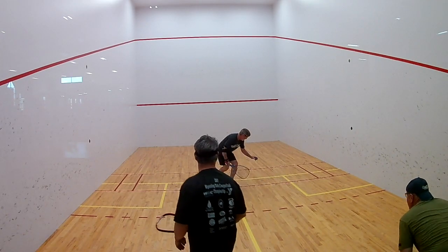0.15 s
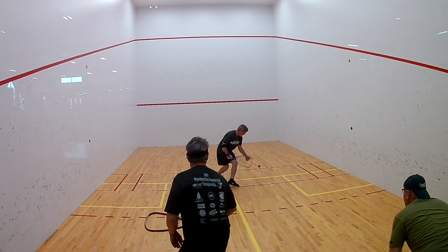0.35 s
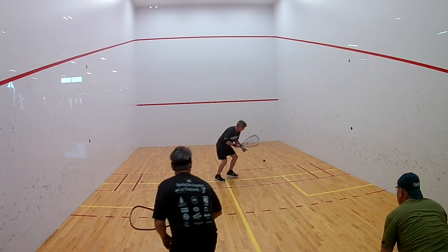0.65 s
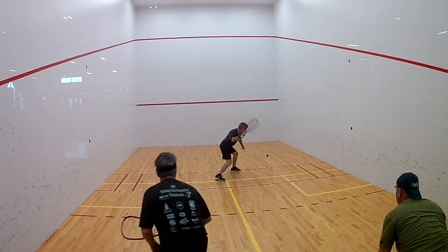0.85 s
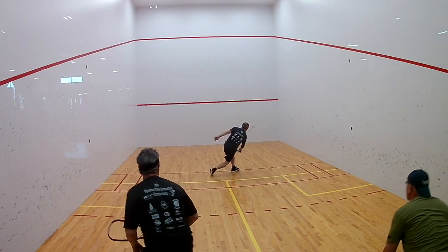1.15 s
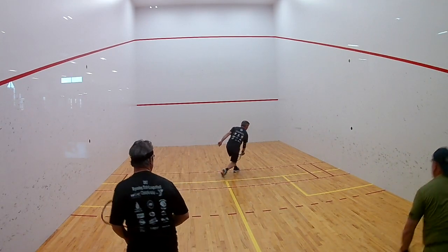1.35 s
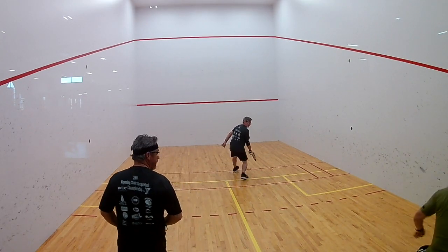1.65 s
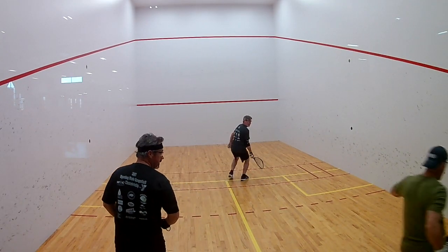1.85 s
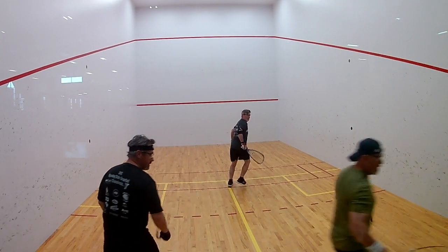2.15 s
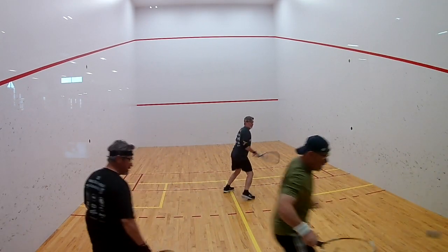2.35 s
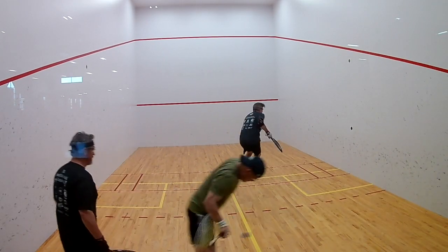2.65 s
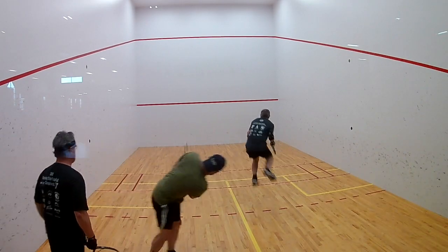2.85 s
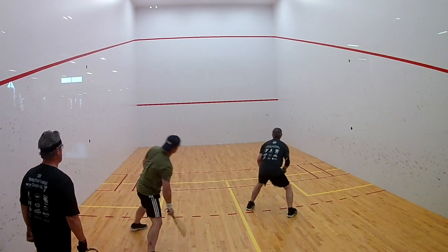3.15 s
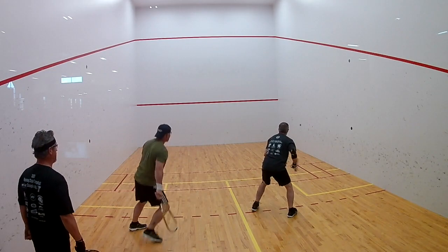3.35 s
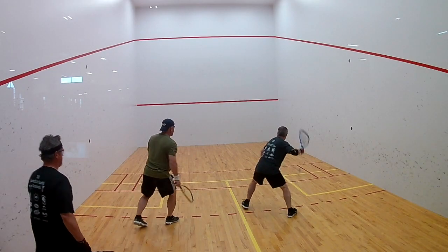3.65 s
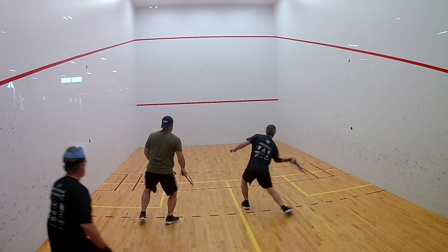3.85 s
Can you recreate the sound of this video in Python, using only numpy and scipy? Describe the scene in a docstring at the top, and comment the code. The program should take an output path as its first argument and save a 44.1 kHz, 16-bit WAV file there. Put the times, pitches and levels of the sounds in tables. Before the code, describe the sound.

Hollow racket and ball hits ring through an indoor court, with thuds and shoe squeaks.

```python
"""Ball court through the glass

One microphone behind the glass back wall of a hard-walled indoor court. A hollow rubber ball is struck
and cracks off the front wall; feet thump the sprung floor and shoes squeak, all ringing on for seconds.
Soles scuff on the near side of the glass, where the echo is shorter. The ventilation hums underneath."""
import sys
import numpy as np
from scipy import signal
from scipy.fft import rfft, irfft, next_fast_len
from scipy.io import wavfile
from scipy.ndimage import uniform_filter1d, map_coordinates

SR = 44100
rng = np.random.default_rng(int(sys.argv[2]) if len(sys.argv) > 2 else 0)


def pcm_store(signal):
    """Save signal as 16-bit PCM."""
    levels = np.round(np.clip(np.atleast_2d(signal), -1, 1) * 32767)
    wavfile.write(sys.argv[1], SR, levels.astype(np.int16).T)


N = 176400

# room tone of the ventilation: (frequency [Hz], relative level [dB])
AIR_SPECTRUM = [(15, -69.5), (25, -17.5), (97, -6), (125, -12.5), (162, -13.5), (195, -13), (252, -11),
                (311, -13.5), (412, -20), (545, -20), (721, -25.5), (773, -21.5), (1290, -29), (1750, -39),
                (1880, -38.5), (2060, -43.5), (2900, -47), (3300, -59.5), (3800, -49.5), (5000, -57.5),
                (6620, -69.5), (8610, -130.5), (14600, -120)]
# how long the court rings: (frequency [Hz], t60 [s])
COURT_T60 = [(100, 0.71), (300, 3.31), (800, 4.93), (1500, 3.3), (3000, 3.18), (6000, 1.82)]
# how slowly the reverberation fills in: (frequency [Hz], time constant [s])
COURT_BUILD = [(150, 0.019), (400, 0.024), (1000, 0.0072), (2500, 0.015), (5000, 0.0054)]
# first reflections off the walls: (delay [s], level [dB])
WALL_ECHOES = [(.03, 24), (.074, 17.5), (.095, 16), (.143, 12)]
# first reflections of the ball's bright snap: (delay [s], level [dB])
SNAP_WALL_ECHOES = [(.045, 15), (.073, 30), (.095, 18.5), (.147, 24.5)]
# colour of a blow heard through the glass: (frequency [Hz], relative level [dB])
GLASS_COLOUR = [(35, -73), (60, -18), (102, -8), (140, -17), (177, -0.5), (207, -11), (284, 0.5),
                (523, -7.5), (662, -2), (1000, -4.5), (1320, -9.5), (1610, -20), (1900, -24), (2780, -28),
                (3200, -38.5), (3600, -36.5), (3820, -25), (4050, -32.5), (4740, -31.5), (6620, -41),
                (8610, -78.5), (14600, -120)]
# dragging soles: (time [s], level [dB], length [s], tilt [dB/octave])
SOLE_SCUFFS = [(0.166, -43, 0.041, -10), (0.376, -34, 0.15, -3), (2.782, -39.5, 0.018, -2.5),
               (2.928, -39, 0.07, -2)]
# slipping shoes: (time [s], level [dB], start pitch [Hz], end pitch [Hz], length [s])
SHOE_SQUEAKS = [(1.66, -71.5, 10900, 9600, .024), (2.342, -49, 4350, 3815, .02),
                (2.751, -62, 6430, 5910, .01), (2.754, -50, 5910, 5670, 0.016)]
# feet landing: (time [s], level [dB], floor pitch [Hz])
FOOTFALLS = [(2.153, -21, 108.8), (2.16, -25, 194.6), (2.176, -26, 60), (2.235, -22.5, 108),
             (3.057, -26, 105)]
# ball contacts: (time [s], level [dB], pock pitch [Hz], pock lag [s], pock hold [s],
# pock into the court [dB], overtone into the court [dB], slap boom [dB], slap bass [dB], slap edge [dB],
# direct pock [dB], its return relative to it [dB], direct slap [dB], flutter depth [dB],
# snap centre [Hz], snap half width [Hz], direct snap t60 [s], direct snap [dB], snap into the court [dB])
BALL_CONTACTS = [(1.074, -22.5, 710, 0.003, 0.017, 2, -8.5, 6, -4, 3, 37, -0.5, 24.6, 1.9, 4300, 1000, 0.044, 6, -23.5),
                 (1.104, -18, 1046, .008, 0.013, -13, -26, 0.5, -8.5, -2, 26.9, -4.5, 23, 1.8, 4530, 1200, 0.17, 15.5, -30),
                 (1.196, -11.5, 680.7, 0.013, 0.015, -18, -16, -4.5, 1, 3.5, 24.7, -6.5, 25, 1.7, 4800, 1300, 0.16, 12.5, -25),
                 (3.199, -19.5, 798.6, 0.0024, 0.012, -1, -8.5, 10, -3.5, -4, 32, -11, 8, 1.6, 4300, 600, 0.082, -1, -36.5),
                 (3.973, -18.5, 734, .0012, .012, 4, -9, 9.5, -7.5, -2.5, 34, -12, 7.3, 5.6, 4200, 600, .04, -11, -42)]
# faint high grit and hiss above 7 kHz: (frequency [Hz], relative level [dB])
GRIT_SPECTRUM = [(6500, -45), (7300, -7.5), (8000, -11.5), (9700, -7.5), (11000, -10), (15500, -10)]

AIR_DB, HUM_DB, WAVER_DB, HUM_HZ, HUM_WIDTH_HZ = -34.5, -44, 3, 93, 13
FLUTTER_S, FLUTTER_DB, FLUTTER_FADE_S = .0305, -2, .16  # echo between the side walls: trip, depth, fade
LENGTHWISE_S, LENGTHWISE_DB = .083, 3.5  # echo between the end walls: trip, depth
SMEAR_T60_S, SNAP_SMEAR_T60_S, BURST_RISE_S = .06, .035, .0015
SCUFF_LOW_HZ, SQUEAK_ROUGHNESS, SQUEAK_DIRECT_DB = 920, .6, 36
STEP_T60_S, STEP_WET_DB, STEP_DIRECT_DB = .15, -11.5, 27
BOOM_HZ, BASS_HZ, EDGE_HZ, TREBLE_HZ, SLAP_TREBLE_DB = 230, 520, 2800, 3500, -8.5
POCK_RISE_S, POCK_T60_S, OVERTONE_RATIO = .003, .011, 1.51
POCK_SAG = .067  # share of its pitch that the pock loses while it is held
END_WALL_S = .074  # the pock returns whole from the far wall after this
GRIT_DB, GRIT_SMOOTH_S, HISS_DB, PEAK_LIMIT, TOP_HZ = -47, .012, -96, .95, 15720


def amp(db):
    """dB to gain."""
    return 10 ** (np.asarray(db) / 20)


def unit(x):
    """Scale to rms 1."""
    return x / np.sqrt(np.mean(x ** 2) + 1e-20)


def unit_energy(x):
    """Scale to energy 1."""
    return x / np.linalg.norm(x)


def along(points, hz):
    """Read (frequency, value) points on a log frequency axis."""
    freqs, values = np.transpose(points)
    return np.interp(np.log(hz + 1), np.log(freqs + 1), values)


def filtered(x, response):
    """Shape x by a gain per frequency."""
    size = next_fast_len(N + 8192)
    return irfft(rfft(x, size) * response(np.fft.rfftfreq(size, 1 / SR)), size)[:N]


def pulse(gain, size=8192):
    """The shortest causal pulse of energy 1 with this gain per frequency."""
    cepstrum = irfft(np.log(gain(np.fft.rfftfreq(size, 1 / SR)) + 1e-6))
    cepstrum[1:size // 2] *= 2
    cepstrum[size // 2 + 1:] = 0
    return unit_energy(irfft(np.exp(rfft(cepstrum))))


def burst(t60=SMEAR_T60_S):
    """Scatter off a rough contact or wall: quickly dying noise of energy 1."""
    t = np.arange(SR // 10) / SR
    return unit_energy(rng.standard_normal(len(t)) * amp(-60 * t / t60) * (1 - np.exp(-t / BURST_RISE_S)))


def ventilation():
    """Room tone: steady air noise and a wavering low hum."""
    waver = map_coordinates(rng.standard_normal(40), [np.arange(N) * 8 / SR])  # 8 values a second
    air = unit(filtered(rng.standard_normal(N), lambda f: amp(along(AIR_SPECTRUM, f))))
    hum = filtered(rng.standard_normal(N), lambda f: 1 / (1 + (2 * (f - HUM_HZ) / HUM_WIDTH_HZ) ** 2))
    return amp(AIR_DB) * air + amp(HUM_DB + WAVER_DB * waver) * unit(hum)


def court(direct, sound, start, wet_db=0, t60_scale=1, flutter_db=FLUTTER_DB, flutter_s=FLUTTER_S,
          echoes=WALL_ECHOES, smear_t60=SMEAR_T60_S):
    """`direct` reaches the microphone first; `sound` follows as wall echoes and a fluttering tail."""
    hz, t, noise = signal.stft(rng.standard_normal(3 * SR), SR, nperseg=256)
    fill = 1 - np.exp(-t / along(COURT_BUILD, hz)[:, None])
    decay = amp(-60 * t / t60_scale / along(COURT_T60, hz)[:, None])
    response = signal.istft(noise * fill * decay, SR, nperseg=256)[1]
    since = np.arange(len(response)) / SR
    response *= amp(flutter_db * np.exp(-since / FLUTTER_FADE_S) * np.cos(2 * np.pi * since / flutter_s))
    for delay, db in echoes:
        response[round(delay * SR):][:SR // 10] += amp(db) * burst(smear_t60)
    heard = amp(wet_db) * signal.fftconvolve(sound, response)
    heard[:len(direct)] += direct
    return np.pad(heard, (round(start * SR), N))[:N]


def scuffs():
    """Soles drag softly on the microphone's side of the glass, where the echo is shorter."""
    out = 0
    for start, db, length, tilt_db in SOLE_SCUFFS:
        progress = np.linspace(0, 1, round(length * SR))
        rub = unit_energy(rng.standard_normal(len(progress)) * np.sin(np.pi * np.sqrt(progress)))
        colour = pulse(lambda f: amp(along(GLASS_COLOUR, f) + tilt_db * np.log2(f / SCUFF_LOW_HZ + .01))
                       / (1 + (SCUFF_LOW_HZ / (f + 1)) ** 4))
        rub = signal.fftconvolve(rub, colour)
        out += amp(db) * court(rub, rub, start, t60_scale=.24)
    return out


def squeaks():
    """Out on the court, rubber slips on varnish: a short rough whistle that falls in pitch."""
    out = 0
    for start, db, from_hz, to_hz, length in SHOE_SQUEAKS:
        progress = np.linspace(0, 1, round(length * SR))
        hz = to_hz + (from_hz - to_hz) * (1 - progress) ** 2
        rough = unit(uniform_filter1d(uniform_filter1d(rng.standard_normal(len(hz)), size=70), size=70))
        envelope = np.sin(np.pi * progress) ** 2 * (1 + SQUEAK_ROUGHNESS * rough)
        tone = unit_energy(envelope * np.sin(2 * np.pi * np.cumsum(hz) / SR))
        out += amp(db) * court(amp(SQUEAK_DIRECT_DB) * tone, tone, start, t60_scale=.94)
    return out


def steps():
    """A foot lands and the sprung floor gives a dull boom."""
    t, out = np.arange(SR // 4) / SR, 0
    for start, db, hz in FOOTFALLS:
        boom = unit_energy(np.sin(2 * np.pi * hz * t) * amp(-60 * t / STEP_T60_S))
        out += amp(db) * court(amp(STEP_DIRECT_DB) * boom, boom, start, wet_db=STEP_WET_DB)
    return out


def ball_slap(boom_db, bass_db, edge_db):
    """The blow of a contact through the glass: one pulse, its lows and treble shaped by shelves."""
    def gain(f):
        below = lambda corner_hz: 1 / (1 + (f / corner_hz) ** 6)
        lows = boom_db * below(BOOM_HZ) + bass_db * below(BASS_HZ)
        edge = -edge_db * (1 + below(EDGE_HZ))  # a positive edge cuts twice the dB below the corner
        treble = SLAP_TREBLE_DB * (1 - below(TREBLE_HZ))
        return amp(along(GLASS_COLOUR, f) + lows + edge + treble)
    return pulse(gain)


def ball_pock(t, hz, lag, hold):
    """The hollow ball's tone and its overtone, sagging in pitch as the squeezed ball recovers."""
    age = np.maximum(t - lag, 0)
    rise = (1 - np.exp(-age / POCK_RISE_S)) ** 2
    swell = unit_energy(rise * amp(-60 * np.maximum(age - hold, 0) / POCK_T60_S))
    phase = 2 * np.pi * np.cumsum(hz * (1 + POCK_SAG * (.5 - age / hold))) / SR
    return swell * np.sin(phase), swell * np.sin(OVERTONE_RATIO * phase)


def ball():
    """Each contact beyond the glass: a slap and a bright snap, the hollow pock swelling just behind."""
    t, out = np.arange(SR // 10) / SR, 0
    trip = round(END_WALL_S * SR)
    for (start, db, hz, lag, hold, pock_db, overtone_db, boom_db, bass_db, edge_db,
         direct_pock_db, return_db, direct_slap_db, flutter_db,
         snap_hz, width_hz, snap_t60, direct_snap_db, snap_wet_db) in BALL_CONTACTS:
        slap = ball_slap(boom_db, bass_db, edge_db)[:len(t)]
        pock, overtone = ball_pock(t, hz, lag, hold)
        direct = amp(direct_pock_db) * (np.pad(pock, (0, trip)) + amp(return_db) * np.pad(pock, (trip, 0)))
        direct[:len(t)] += amp(direct_slap_db) * signal.fftconvolve(slap, burst())[:len(t)]
        into_court = slap + amp(pock_db) * pock + amp(overtone_db) * overtone
        body = court(direct, into_court, start, flutter_db=flutter_db)
        # the snap stays distinct as it bounces between the end walls
        snap = pulse(lambda f: amp(along(GLASS_COLOUR, f)) / (1 + ((f - snap_hz) / width_hz) ** 4))
        snap = snap[:len(t)]
        direct_snap = amp(direct_snap_db) * signal.fftconvolve(snap, burst(snap_t60))
        bright = court(direct_snap, snap, start, wet_db=snap_wet_db, flutter_db=LENGTHWISE_DB,
                       flutter_s=LENGTHWISE_S, echoes=SNAP_WALL_ECHOES, smear_t60=SNAP_SMEAR_T60_S)
        out += amp(db) * (body + bright)
    return out


def scene():
    """Everything at one spot behind the glass, in mono."""
    return (ball() + squeaks() + scuffs() + steps() + ventilation())[None]


def record(dry):
    """Peaks round off; faint high grit swells with loud sounds over a thin steady hiss; the top is cut."""
    x = dry[0]
    loudness = np.sqrt(np.abs(uniform_filter1d(x ** 2, round(GRIT_SMOOTH_S * SR))))
    grit = unit(filtered(rng.standard_normal(N), lambda f: amp(along(GRIT_SPECTRUM, f))))
    rounded = x / (1 + np.abs(x / PEAK_LIMIT) ** 4) ** (1 / 4)
    noisy = rounded + (amp(GRIT_DB) * loudness + amp(HISS_DB)) * grit
    return filtered(noisy, lambda f: f < TOP_HZ)[None]


dry = scene()
out = record(dry)
pcm_store(out)
```